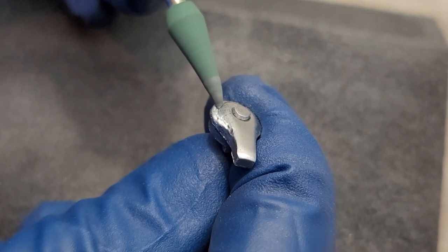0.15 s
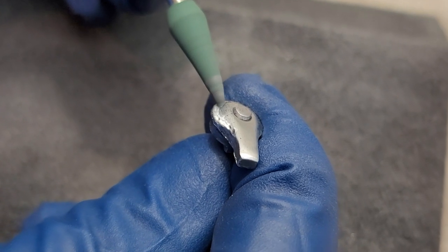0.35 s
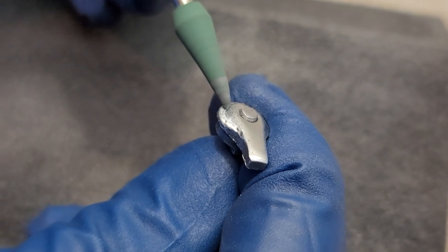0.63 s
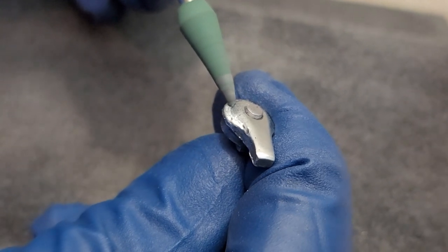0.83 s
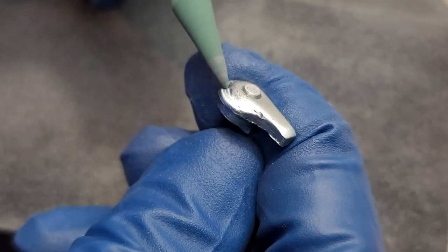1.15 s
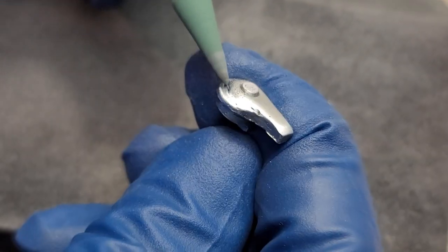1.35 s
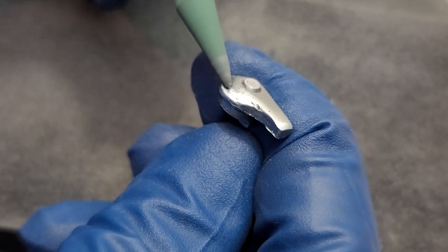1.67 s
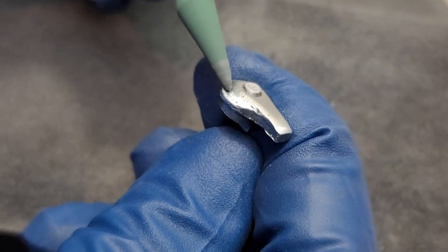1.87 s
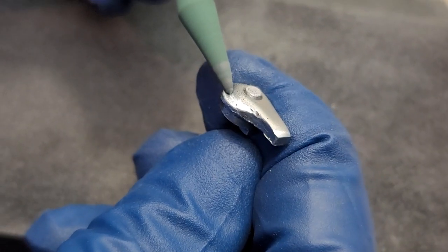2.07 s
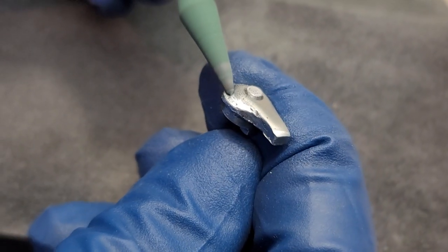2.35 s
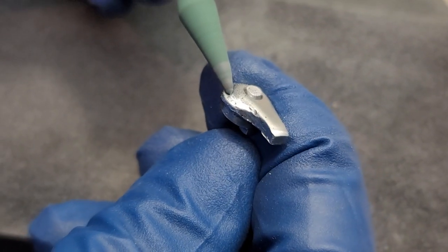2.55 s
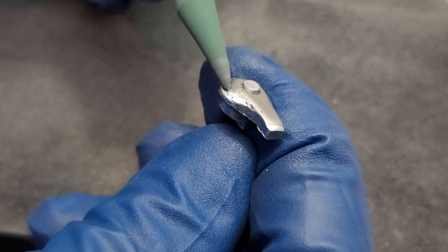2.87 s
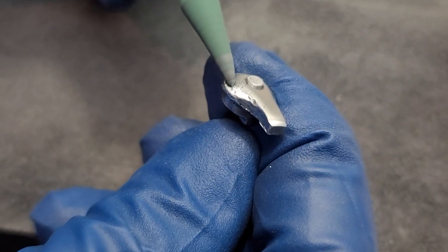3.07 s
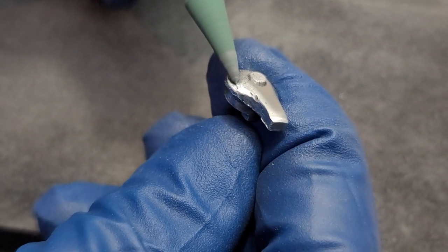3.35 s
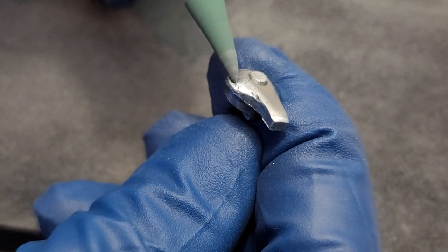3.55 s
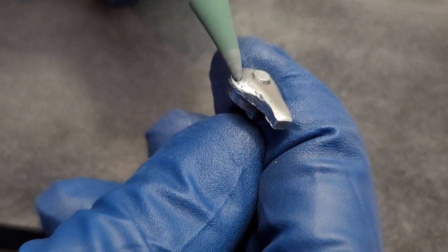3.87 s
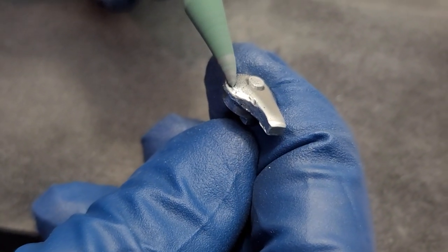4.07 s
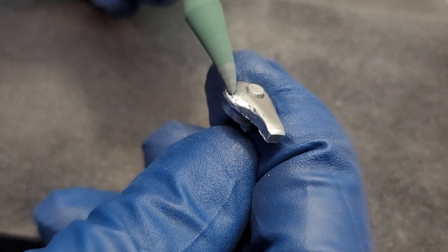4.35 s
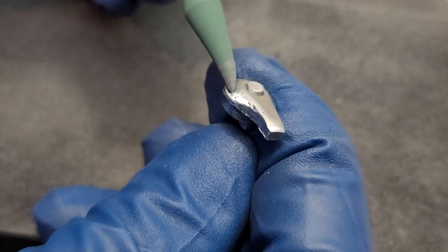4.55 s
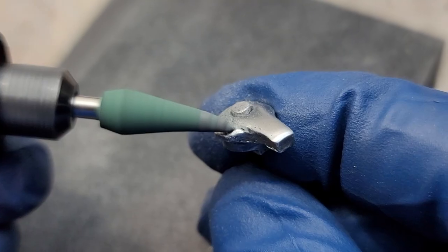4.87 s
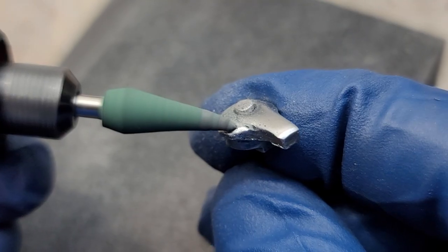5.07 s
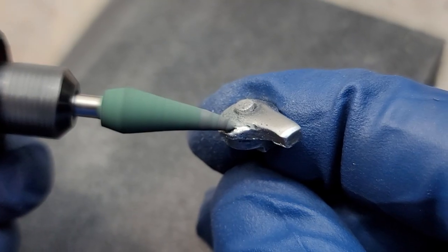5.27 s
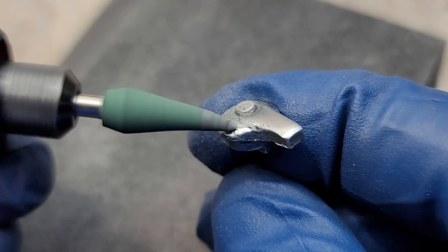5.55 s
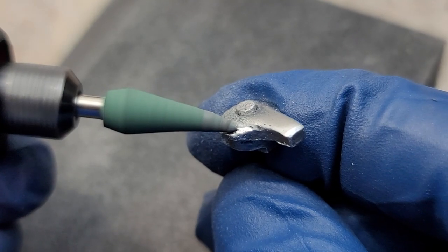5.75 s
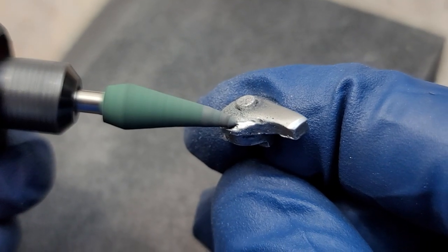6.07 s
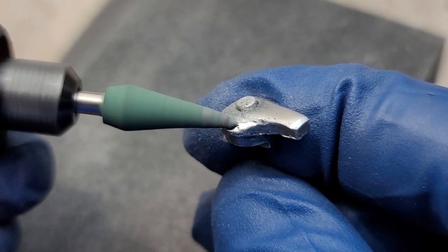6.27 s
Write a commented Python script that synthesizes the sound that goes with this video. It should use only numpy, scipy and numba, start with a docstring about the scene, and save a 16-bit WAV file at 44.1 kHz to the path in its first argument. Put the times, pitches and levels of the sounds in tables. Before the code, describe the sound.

Close and dry stereo pickup of a polishing point spinning on metal. Dense buzzing motor drone, shrill whistle and fine grinding hiss never pause. First a short level pass, then a sudden step up in pitch followed by a long uneven downward sag, then a sudden change to a steadier, lower pass with more gritty rubbing. It ends abruptly while still running.

```python
"""A small rotary tool with a polishing point runs against a metal part held in gloved fingers: three joined passes.
0-1.1 s: held from above, the shaft sings at 144-146 rev/s. 1.1-4.6 s: the pitch jumps to 163-164 rev/s, sags to 129.
4.6-6.4 s: held from the side, near 132 rev/s, with a stronger scuff.
In each pass a tone whistles (motor drive), filtered noise hisses (grinding) and a sum of shaft multiples sings.
Two close microphone ports hear each with their own level and phase."""
import sys
import numpy as np
from numba import njit
from scipy import signal
from scipy.io import wavfile
from scipy.ndimage import uniform_filter1d

SR = 44100
rng = np.random.default_rng(int(sys.argv[2]) if len(sys.argv) > 2 else 0)


def waveform_to_disk(signal):
    """Save audio, clipped to [-1, 1], as 16-bit WAV at the path in sys.argv[1]."""
    frames = np.transpose(np.atleast_2d(signal))
    scaled = np.clip(frames, -1, 1) * 32767
    samples = np.round(scaled).astype(np.int16)
    wavfile.write(sys.argv[1], SR, samples)


def natural_amplitude(level_db):
    """Convert a level in decibels to a linear amplitude factor, elementwise."""
    exponent = np.asarray(level_db, float) / 20
    return 10 ** exponent


N = 283122
HOP, ORDERS = 256, 122  # control frame [samples], shaft multiples summed
DRIVE_HZ = 3962

# shaft speed, one table a pass: (time [s], speed [rev/s])
SPEED = [
    [(0, 143.73), (0.225, 145.25), (0.47, 146.05), (0.755, 145.65), (0.905, 145.88), (1.11, 144.3)],
    [(1.11, 162.96), (1.375, 164.2), (1.545, 161.45), (1.885, 155.8), (2.035, 154.22), (2.125, 152.6),
     (2.35, 150.0), (2.52, 150.0), (2.765, 148.84), (2.955, 146.6), (3.265, 145.65), (3.53, 144.7),
     (3.695, 140.95), (3.835, 138.1), (4.025, 134.95), (4.265, 131.6), (4.632, 128.95)],
    [(4.632, 132.4), (4.78, 131.0), (4.867, 131.22), (5.047, 132.65), (5.36, 133.7), (5.447, 133.39),
     (5.697, 131.9), (6.057, 132.15), (6.2, 131.45), (6.297, 132.2), (6.42, 131.85)],
]
# how the point bears, one table a pass: (time [s], scuff before weighting [dB], whine above 5.3 kHz [dB],
# ring of the part [Hz], ring [dB], knock of the orders near 2.1 kHz [dB]); grit takes part of whine and ring
LOAD = [
    [(0, -1, 1.5, 9300, -12, -1.5), (.12, -8, 1, 9300, -8, -0.5), (.22, 2.5, 0, 9300, -8, 0.5),
     (.4, -6.5, 1, 9300, 2, 0), (.75, -6.5, 1.5, 9300, 0, 5.5), (1.11, -1.5, 1, 9300, 1, -8.5)],
    [(1.11, -2, 1, 8600, 10, -12), (1.35, -5.5, 2.5, 8670, 10.5, -2), (1.6, -2, 1, 8600, 6, 7.5),
     (1.95, -3, 2.5, 9200, 8, 2), (2.3, -10.5, 1.5, 9300, 10.5, 1.5), (2.7, -8, 2.5, 9300, 7.5, -2.5),
     (3, -10.5, 0.5, 9300, 5.5, 1.5), (3.45, -6.5, 0, 9300, 4, -8.5), (3.7, -3.5, 0, 9330, 6.5, -1),
     (4.1, -12, 1.5, 9280, 8, -1.5), (4.4, -9, 0.5, 9140, 6.5, -4.5), (4.632, -8, -1, 9000, 0, 0.5)],
    [(4.632, 6, 1.5, 9600, 9, 3), (5, 3, 3, 9540, 10, 1), (5.4, 4.5, 3, 9530, 16, 0),
     (5.8, 4, 3.5, 9750, 1, -2), (6.15, 0.5, 2.5, 9600, 8, -0.5), (6.42, -5.5, 3, 9750, 2, -1)],
]
# high orders that stand out or drop away, one table a pass: (order [-], level over colour [dB])
HIGH_ORDERS = [
    [(45, 7), (56, 7), (74, 7), (88, 5), (95, 6)],
    [(104, -8), (105, -9), (106, -12)],
    [(33, -20), (34, -7), (72, -6), (74, 7), (85, -6), (97, -8), (106, -11), (111, 6), (114, 6)],
]
# band where both ports are deaf: (frequency [Hz], order left [dB], order right [dB], grit left [dB per Hz])
NOTCH = [(5280, -108, -85, -120), (5430, -125, -137, -120)]
# lead of the left port in the treble, tool held from above: (frequency [Hz], phase [rad])
TREBLE_LEAD = [(6500, 4.9), (7200, 5.1), (8100, 2.0), (9200, 0.6), (9800, 3.0), (12800, 4.0), (14500, 8.0),
               (15700, 10)]
# lead of the left port, one table a pass: (frequency [Hz], phase [rad])
LEADS = [ [(150, -2.5), (300, 2.5), (450, 4.5), (600, 1.0), (750, 2), (1000, 1.5), (1150, 4), (1300, 3.0),
         (1450, 3), (1900, 4), (2150, 1.3), (2300, 4), (2600, 5.5), (3050, 4.5), (3600, 5), (4400, 7.5),
         (4650, 9.0)] + TREBLE_LEAD, [(150, -3.5), (300, 2.5), (420, -2.5), (700, -1.5), (750, -8.0),
         (800, -5.5), (1450, -3.5), (1900, -2), (2100, -1.5), (2350, -2.5), (2600, -0.9), (3600, -2),
         (3960, -0.2), (4400, 1.55), (4680, 3)] + TREBLE_LEAD, [(150, 0.86), (250, 1.5), (400, 1.5),
         (800, 1.5), (950, 4), (1200, 1.5), (1350, -3.5), (1450, -2.5), (1700, -1.2), (2000, -3),
         (2250, -2), (2650, -2), (3150, 3.5), (3620, 0.8), (3950, 3.0), (4200, 3.3), (4400, 4.5),
         (4740, 4.5), (6850, 11), (14550, 39.5)], ]
# switching tone and sidebands, before the gain of the pass: (shaft multiple added [-], left [dB], right [dB])
DRIVE_TONES = [(-3, -62, -63), (0, -67, -67), (1, -64, -64), (2, -64, -64), (3, -54, -56), (4, -66, -65)]
# gain of the drive, one row a pass: (left [dB], right [dB])
DRIVE_GAIN_DB = [(2.5, 3.5), (2.5, 0), (1.5, 8.5)]
# low orders in each grip of the fingers, rows evenly spread over a pass: (orders 1, 2, .. 30 over colour [dB])
GRIPS = [
    [(-0.3, -4.5, -1.1, 0.3, 1.8, 0, 1, 5.1, 0, -3, 2.3, -11.5, 2.7, -1, 4.1, 6.5, 0.77, 3.7, -16, 0, 4.4, 1.5, 6.9, 6.2, 5.3, -0.81, 11.6, -19, 5, 3.8)],
    [(-7, -12, -2, 2.5, -2, 5.7, 1.8, -3.5, -0.5, -2, 2.5, 2, 1, 1.5, 5.3, -9, -10, 1, -27, 4.5, 2.7, 0.5, 2.6, 2.7, -5, -1, 2, 1.9, -8, 2.2),
     (-4, -10, -3.5, 3, -1, 1.2, 4.6, 0, -2, 3, 1.4, -4.5, 2.5, -2, 6.2, 5.5, 2, 1, -9, -1.5, 3.5, 4, 3.2, 2.4, 0.5, -0.63, 3.9, 2.4, 7, 2.3),
     (1, -12, -6, 0, -6, 8.9, 9, 3, 2, -4.5, 0.5, -10, 4, 2, 7.8, -0.5, -6, -1, -11, -7, 4.7, 3, 2, 5.1, 0.5, -2, 2.8, 7.3, -7, 2.2)],
    [(0, -0.5, 0.61, 1, -13, 8.1, 1.7, -12, 6.8, 8, 4.9, -8, 5.8, -6.5, 6, -1, -2, -7, -30, 3, 4.9, 2.8, 3.8, 6.6, -20, -2, 3.9, 3.6, -16, -27)],
]
# base colour of tool, hand and ports, low part, tool held from above, then from the side:
# (frequency [Hz], order left [dB], order right [dB], grit left [dB per Hz])
ABOVE_LOW = [(95, -78, -99, -81.3), (260, -60, -61, -60), (520, -63, -70.5, -88),
             (820, -64.5, -72.5, -85.5), (1134, -81, -69.5, -89), (1352, -49, -48, -77),
             (1780, -51.5, -51, -75), (2000, -53.5, -50, -75), (2184, -52.5, -63.5, -75),
             (2830, -60, -68, -80.5), (3156, -65, -69.5, -82), (3572, -54.5, -61, -86),
             (3975, -66.5, -75, -82), (4360, -66, -88, -129), (4980, -63, -72.5, -111.1)]
BESIDE_LOW = [(100.0, -59, -75.5, -80.2), (220, -66, -65.5, -80), (483, -58.5, -68.5, -85.5),
              (734, -57.5, -57.5, -88), (1100, -67.5, -80, -86.5), (1435, -63, -65, -83.5),
              (1856, -51, -62, -84), (2110, -54.5, -55, -75.5), (2764, -54.5, -64, -77),
              (3020, -84, -62.5, -87.5), (3525, -55, -65.5, -80.5), (4030, -62, -72, -87),
              (4410, -56.5, -54, -85), (4894, -62, -79, -80)]
# base colour, high part, one table a pass: columns as above
HIGHS = [
    [(6460, -67, -73, -102.9), (6740, -69, -56, -86), (7570, -64.5, -79, -86.5), (8400, -59.5, -87, -82),
     (8900, -63, -74, -80), (9300, -57, -58, -81), (11200, -64, -60.5, -79), (11250, -58.5, -60, -83),
     (12300, -60.5, -88, -83), (13800, -61, -75, -87), (15100, -55, -62, -85), (15800.0, -50, -60, -91)],
    [(5730, -89, -74.5, -111.2), (6320, -104, -68, -101.9), (6840, -62.5, -60, -86),
     (7890, -66, -76, -88.5), (8050, -59, -104, -80), (8600, -58, -64, -82), (9000, -57.5, -61, -82.5),
     (9460, -56, -59, -82), (9750, -67, -63.5, -86), (10100, -61, -60, -85), (10600, -59.5, -61.5, -80.5),
     (12000, -62, -79, -84.5), (13200, -66, -75, -83), (14900, -55.5, -67, -84), (15900, -53, -64, -74)],
    [(5866, -80, -73, -87), (6400, -67.5, -109, -86.5), (6830, -59.5, -56.5, -88),
     (7310, -65.5, -87, -82.5), (8500, -68.5, -80, -99), (8720, -64.5, -86, -80.5),
     (9300.0, -64, -102, -84), (10110, -69, -58, -87.5), (10750, -57.5, -68, -79), (11800, -82, -65, -90),
     (12300, -59, -70, -81), (13900, -64.5, -72, -88), (15000.0, -66.5, -73, -88), (15900, -56, -65, -95)],
]
# narrow peaks and dips in the level of the orders, tool held from above, then from the side:
# (frequency [Hz], width [Hz], level [dB])
ORDER_PEAKS = [
    [(580, 91, 3), (1105, 33, -6.5), (1342.5, 31, 8.5), (1528, 43, 8.5), (1711, 40, 3.5), (2072, 61, -7),
     (2370, 29, 5.5), (2950, 72, 3.5), (3327, 68, 6.5), (3630, 56, 5.5), (4010, 38, 6)],
    [(3900, 80, -3), (4140, 54, -11)],
]
# orders near 3.8 kHz: (time [s], level [dB])
BUZZ = [(0, -0.5), (1.1, -1), (1.3, 7.5), (1.6, -6.5), (2.1, -7), (2.5, 3), (3.2, 4), (3.6, 3), (3.9, -4),
        (4.6, 1), (6.42, -2)]
# orders near 1.4 kHz: (time [s], level [dB])
DRONE = [(1.05, -4), (1.25, 3), (1.45, -3), (2.1, -1.5), (2.85, -2), (3.1, 0), (3.6, -1), (3.85, -6),
         (4.25, 0), (4.5, 2), (4.7, 1.5)]
# how far the orders swell and sink: (pass 1, pass 2, pass 3 [factor])
UNSTEADY = (.8, .95, .4)


def read(rows, hz, col):
    """Reads one column of a spectrum on a log-frequency axis."""
    rows = np.array(rows)
    return np.interp(np.log(hz + 1), np.log(rows[:, 0] + 1), rows[:, col])


def drift(shape, size):
    """Twice-averaged noise: slow chance of unit spread along the first axis."""
    x = uniform_filter1d(uniform_filter1d(rng.standard_normal(shape), size, 0), size, 0)
    return x / x.std()


def bump(hz, centre_hz, width_hz):
    """Gaussian over frequency, 1 at its centre."""
    return np.exp(-((hz - centre_hz) / width_hz) ** 2)


def load_db(p, t, hz):
    """Load shifts the treble level; a ring of the part shifts with the place of contact."""
    s, *columns = np.transpose(LOAD[p])
    whine_db, ring_hz, ring_db = (np.interp(t, s, c)[:, None] for c in columns[1:4])
    return whine_db * (hz > 5300) + ring_db * bump(hz, ring_hz, 170)


def order_peaks_db(p, hz):
    """Narrow peaks and dips in level, crossed by the orders as the shaft speed shifts."""
    return sum(peak_db * bump(hz, at_hz, width_hz) for at_hz, width_hz, peak_db in ORDER_PEAKS[p // 2])


def drive(p, angle, waver_db=1.0):
    """Motor-drive whistle: a switching tone beats with the shaft, giving sidebands at shaft multiples."""
    n = np.arange(len(angle))
    frames = len(n) // HOP + 1
    carrier = 2 * np.pi * DRIVE_HZ * n / SR
    mean_speed_hz = angle[-1] / (2 * np.pi) * SR / len(n)
    out = 0
    for multiple, *port_db in DRIVE_TONES:
        right_lag = read(LEADS[p], DRIVE_HZ + multiple * mean_speed_hz, 1)
        lag = np.array([[0], [right_lag]])
        swell_db = waver_db * np.interp(n / HOP, np.arange(frames), drift(frames, size=20))
        tone = np.cos(carrier + multiple * angle + 2 * np.pi * rng.random() - lag)
        level_db = np.add(port_db, DRIVE_GAIN_DB[p])[:, None] + swell_db
        out = out + np.sqrt(2) * natural_amplitude(level_db) * tone
    return out


def grit(p, colour, t, angle, throb=0.2, share=0.12, patchy_db=2, low_cap_db_per_hz=-87.5):
    """Abrasive hiss: noise in drifting patches, pulsing once a turn as the point runs out of true."""
    hz = np.fft.rfftfreq(4 * HOP, 1 / SR)
    a, b, c, d = rng.standard_normal((len(t), len(hz), 4)).transpose(2, 0, 1)
    patches = uniform_filter1d(drift(a.shape, size=8), 10, 1)
    s, scuff_db = np.transpose(LOAD[p])[:2]
    left_db = read(colour, hz, 3)
    left_db = np.where(hz < 450, np.minimum(left_db, low_cap_db_per_hz), left_db)
    left_db -= read([(20, 18), (60, 11), (140, 13), (180, -1.5), (300, 0)], hz, 1)  # the ports pass little bass
    scuff_weight = read([(500, 0.25), (1300, 0.87), (2700, 0.76), (4000, 0.17)], hz, 1)
    db = left_db + patchy_db * patches / patches.std()
    db += np.interp(t, s, scuff_db)[:, None] * scuff_weight
    db += 0.27 * load_db(p, t, hz[None])

    same = read([(100, 1.0), (1500, 0.78), (4000, 0.57), (12000, 0.32)], hz, 1)  # correlation of the ports
    left = a + 1j * b
    lead = read(LEADS[p], hz, 1) * (hz > 400)  # low grit reaches both ports together
    right = (same * left + np.sqrt(1 - same ** 2) * (c + 1j * d)) * np.exp(-1j * lead)
    right *= natural_amplitude(share * (read(colour, hz, 2) - read(colour, hz, 1)))  # part of the ports' difference for orders
    z = np.array([left, right]) * natural_amplitude(db) * (hz < 15760)
    hiss = signal.istft(z.transpose(0, 2, 1), nperseg=4 * HOP, noverlap=3 * HOP)[1][:, :len(angle)]
    per_hz = np.sqrt(SR / (4 * HOP) * 0.75)  # spectral density to istft scale
    return per_hz * hiss * (1 + throb * np.cos(angle))


@njit(fastmath=True)
def comb(angle, strength, hop):
    """Sums all multiples of the shaft angle with complex strengths that glide from frame to frame."""
    out = np.zeros((2, len(angle)))
    for i in range(len(angle)):
        j, u = i // hop, (i % hop) / hop
        turn, z = np.exp(1j * angle[i]), 1 + 0j
        for k in range(strength.shape[1]):
            z *= turn
            for c in range(2):
                out[c, i] += (z * ((1 - u) * strength[j, k, c] + u * strength[j + 1, k, c])).real
    return out


def standing_db(p, t, speed, hz, knock_db, spread_db=1.8, shake_db_per_hz=0.2113):
    """Order levels over the colour, set by grip, shaft speed, knock, narrow peaks, buzz and drone."""
    db = spread_db * drift(hz.shape, size=90)
    for order, order_db in HIGH_ORDERS[p]:
        db[:, order - 1] = order_db
    grips = np.transpose(GRIPS[p])
    grip_db = np.transpose([np.interp(t, np.linspace(t[0], t[-1], len(g)), g) for g in grips])
    low = slice(len(grips))
    db[:, low] = grip_db + 0.41 * db[:, low]
    db[:, low] += shake_db_per_hz * (speed - speed.mean())[:, None]
    db += knock_db * bump(hz, 2135, 360) + order_peaks_db(p, hz)
    db += np.interp(t, *np.transpose(BUZZ))[:, None] * bump(hz, 3770, 470)
    db += np.interp(t, *np.transpose(DRONE))[:, None] * bump(hz, 1380, 140)
    return db


def orders(p, colour, t, speed, angle, waver_db=2.5, flutter_db=2.0, own_db=2.0,
           scatter=1.415, slip=0.6, own_slip=0.5):
    """Every turn repeats the knocks of point, bearing and brushes; each order swells and slips slowly."""
    hz = speed[:, None] * np.arange(1, ORDERS + 1)
    knock_db = np.interp(t, *np.transpose(LOAD[p])[[0, -1]])[:, None]
    db = standing_db(p, t, speed, hz, knock_db)

    # orders swell most from 1.4 to 6 kHz, less lower down, least near 9 kHz
    depth_by_hz = [(600, 0.8), (1400, 1), (6000, 1), (8500, 0.5), (9800, 0.5), (11000, 0.7)]
    depth = UNSTEADY[p] * read(depth_by_hz, hz, 1)
    swell_db = waver_db * drift(hz.shape, size=30) + flutter_db * drift(hz.shape, size=6)
    db += load_db(p, t, hz) + depth * swell_db

    # a hard knock locks the low orders in step
    loose = np.clip(0.48 - 0.2 * knock_db, 0.15, 1) ** np.clip(4000 / hz - 0.5, 0, 1)
    loose *= 1 - 0.7 * bump(hz, 9100, 600)  # the part rings once a turn near 9 kHz
    blur = hz / 9000  # timing errors of the knocks smear the high orders most
    # neighbours partly in step: one main knock a turn
    bunched = np.cumsum(scatter * loose * rng.standard_normal(ORDERS), axis=1)
    phase = bunched + slip * (0.74 + blur) * drift(hz.shape, size=6)

    ports = []
    for c in range(2):
        own_swell_db = depth * own_db * np.minimum(0.66 + blur, 1) * drift(hz.shape, size=30)
        port_db = db + read(colour, hz, 1 + c) + own_swell_db
        port_phase = phase + own_slip * blur ** 1.3 * drift(hz.shape, size=20)
        port_phase = port_phase - c * read(LEADS[p], hz, 1)
        ports.append(natural_amplitude(port_db) * np.exp(1j * port_phase))
    top_fade = np.clip((15800 - hz) / 100, 0, 1)[..., None]
    return comb(angle, np.sqrt(2) * np.stack(ports, 2) * top_fade, HOP)


def scene():
    """Three passes, one straight after the other, each summing drive, grit and orders."""
    starts = [round(rows[0][0] * SR) for rows in SPEED] + [N]
    out = np.zeros((2, N))
    for p, low in enumerate([ABOVE_LOW, ABOVE_LOW, BESIDE_LOW]):
        colour = low + NOTCH + HIGHS[p]
        a, b = starts[p], starts[p + 1]
        t = (a + HOP * np.arange((b - a) // HOP + 2)) / SR
        speed = np.interp(t, *np.transpose(SPEED[p]))
        speed = speed + 0.045 * drift(len(t), size=3)  # the shaft hunts a little
        angle = 2 * np.pi * np.cumsum(np.interp(np.arange(a, b) / SR, t, speed)) / SR
        sound = drive(p, angle) + grit(p, colour, t, angle) + orders(p, colour, t, speed, angle)
        n = np.arange(b - a)
        out[:, a:b] = sound * np.clip(np.minimum(n, n[::-1]) / 40, 0, 1)  # soft edges
    return out


def roll_off(x):
    """The treble ends steeply here."""
    return signal.sosfilt(signal.butter(12, 16960, fs=SR, output="sos"), x)


def record(dry):
    """Delivers the finished two-port mix."""
    return roll_off(dry)


dry = scene()
out = record(dry)
waveform_to_disk(out)
```